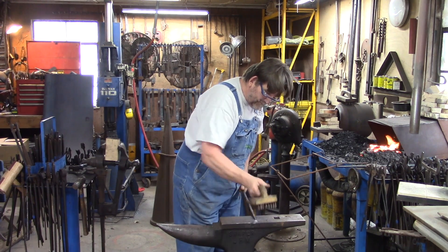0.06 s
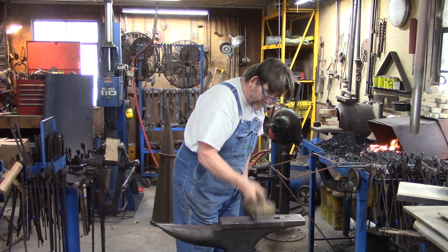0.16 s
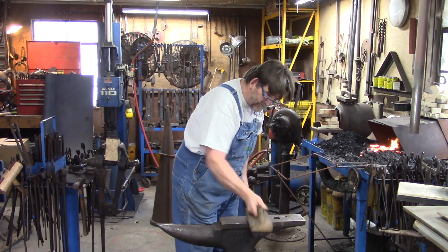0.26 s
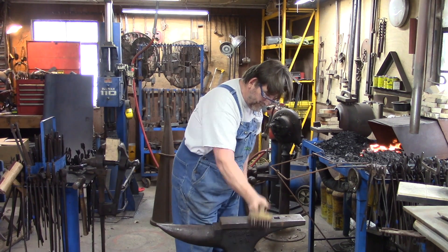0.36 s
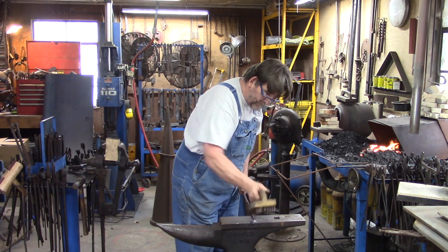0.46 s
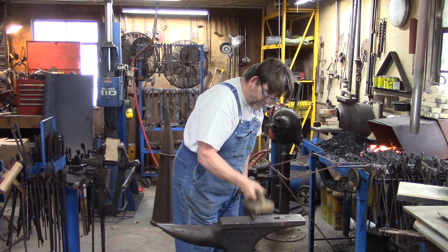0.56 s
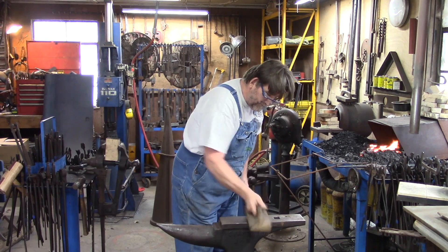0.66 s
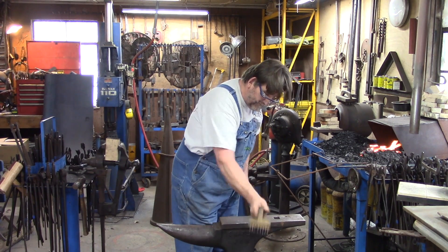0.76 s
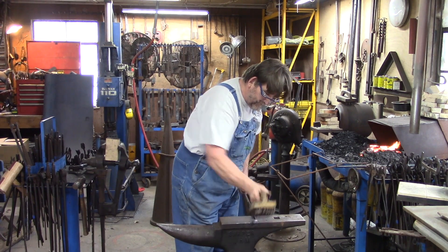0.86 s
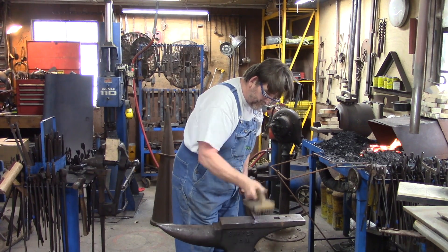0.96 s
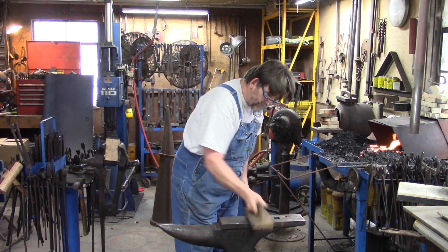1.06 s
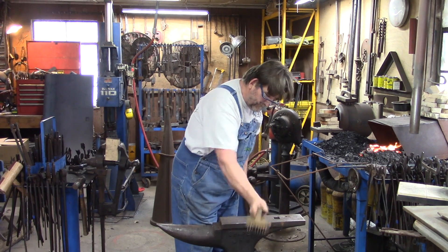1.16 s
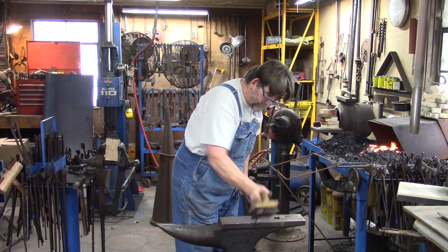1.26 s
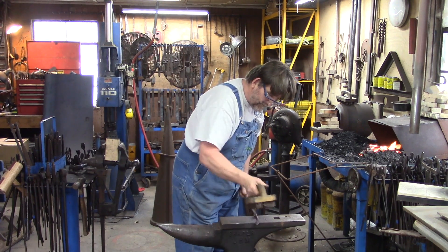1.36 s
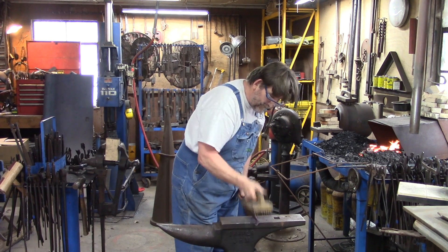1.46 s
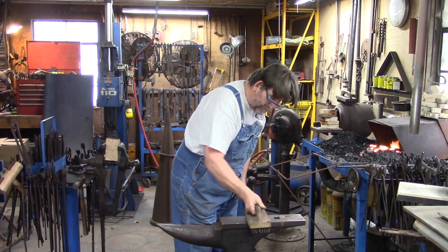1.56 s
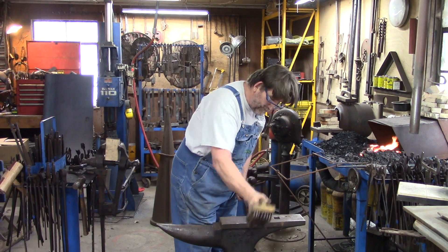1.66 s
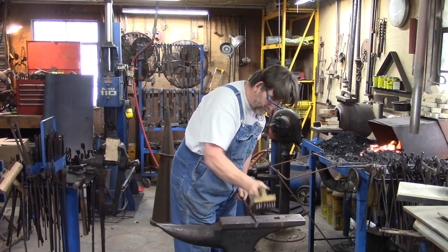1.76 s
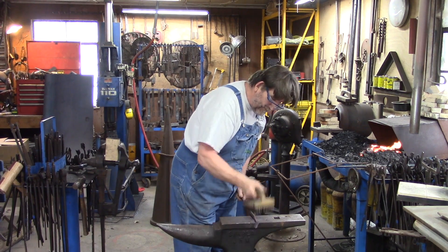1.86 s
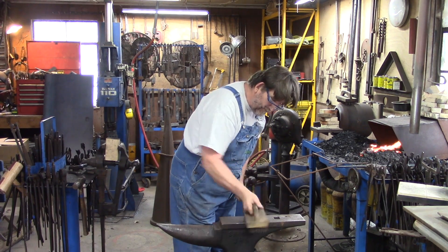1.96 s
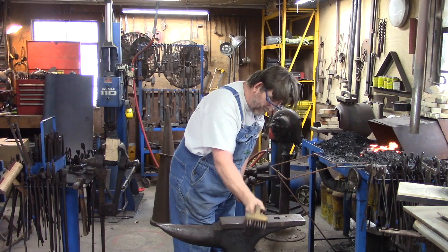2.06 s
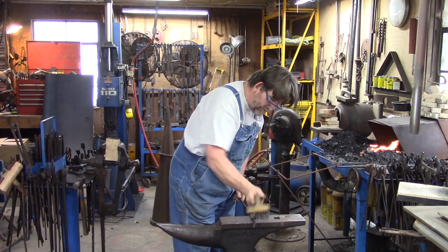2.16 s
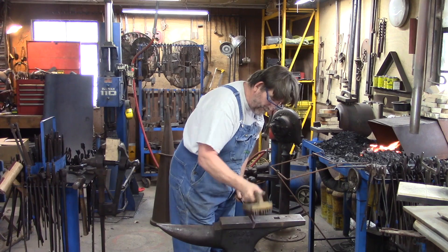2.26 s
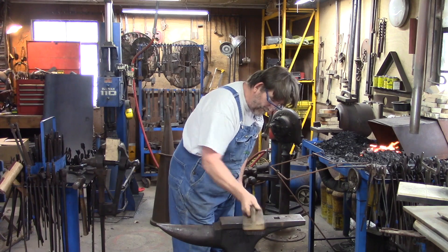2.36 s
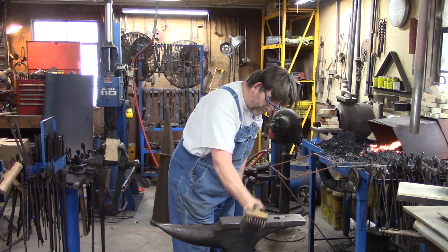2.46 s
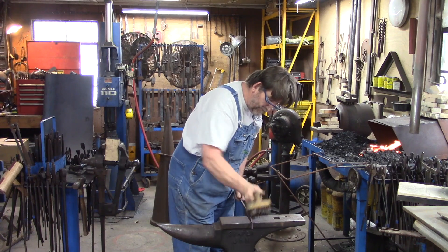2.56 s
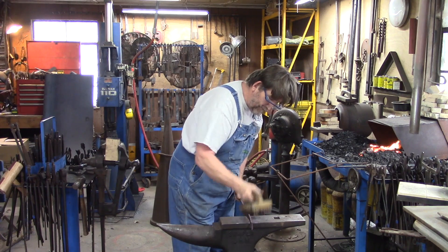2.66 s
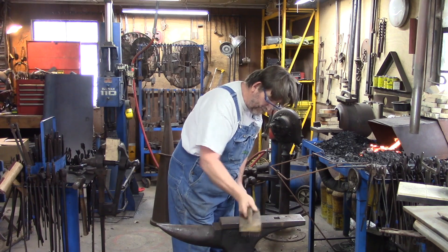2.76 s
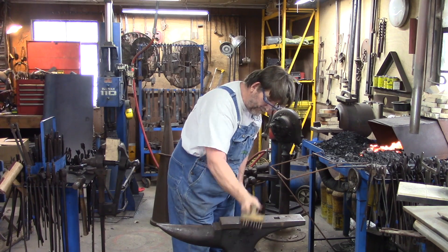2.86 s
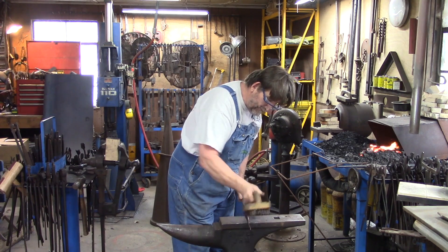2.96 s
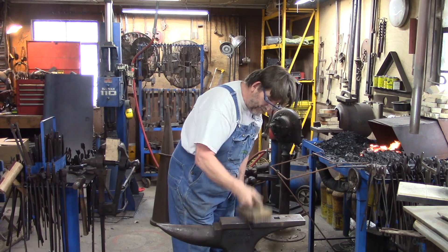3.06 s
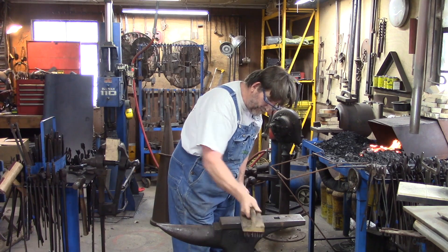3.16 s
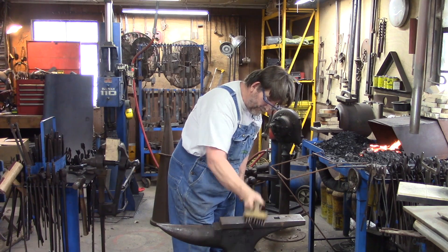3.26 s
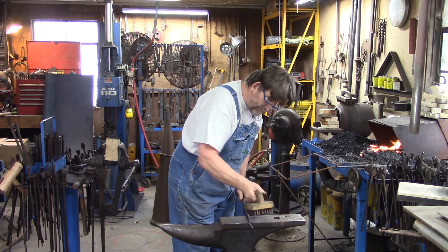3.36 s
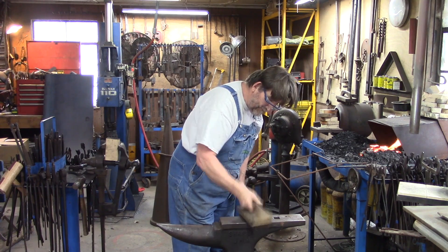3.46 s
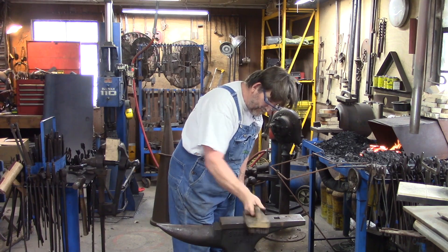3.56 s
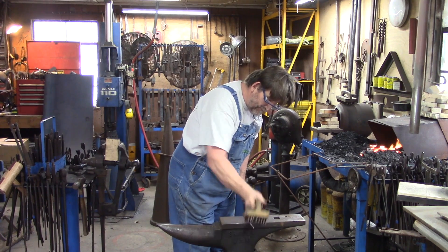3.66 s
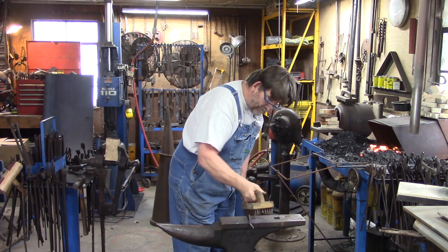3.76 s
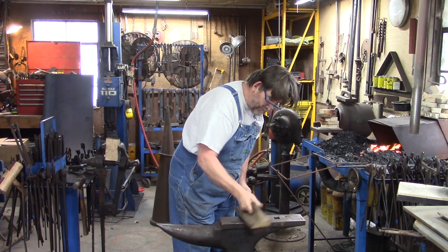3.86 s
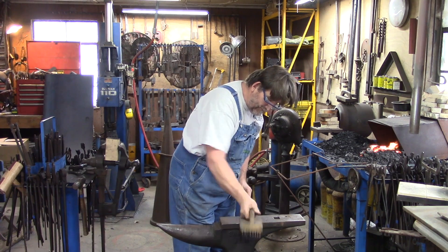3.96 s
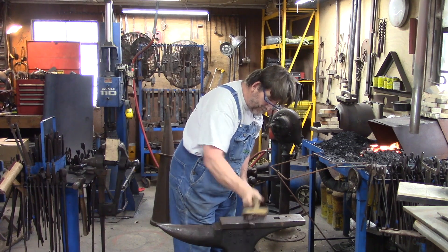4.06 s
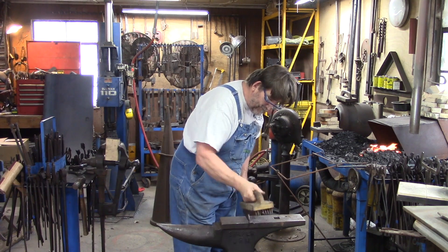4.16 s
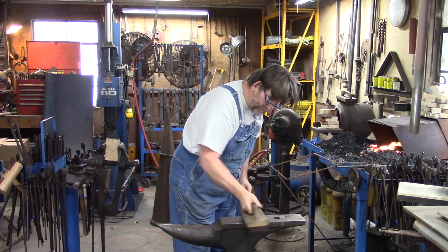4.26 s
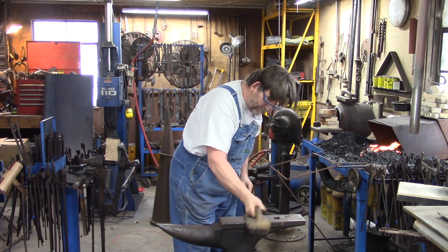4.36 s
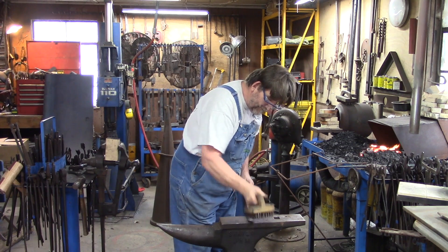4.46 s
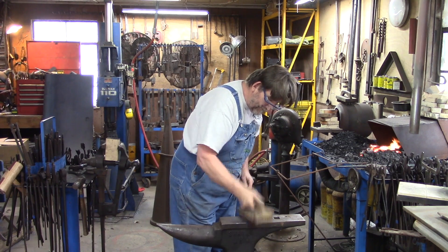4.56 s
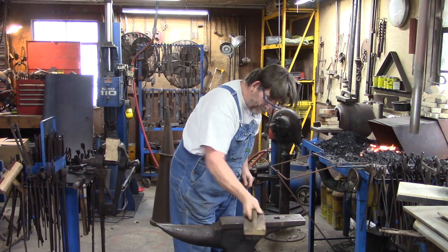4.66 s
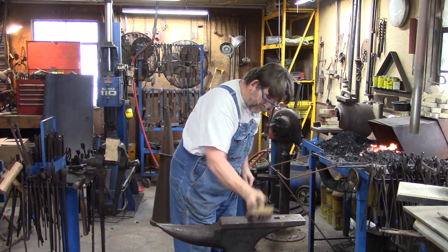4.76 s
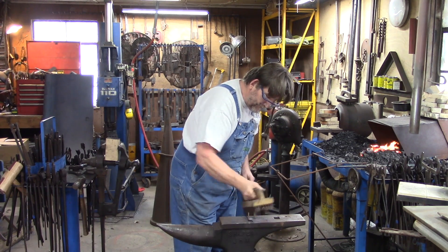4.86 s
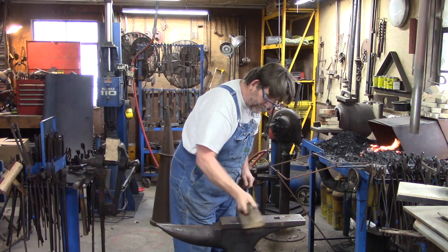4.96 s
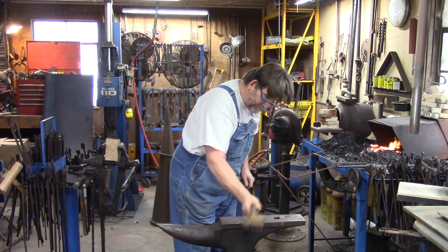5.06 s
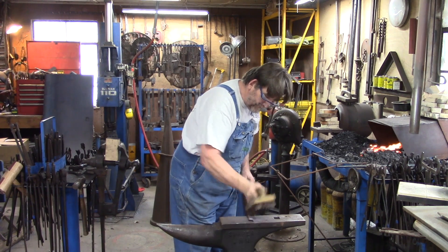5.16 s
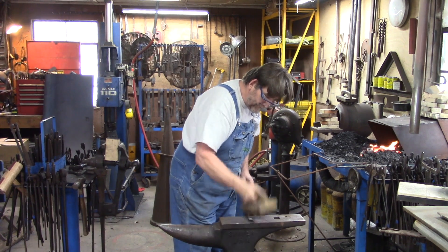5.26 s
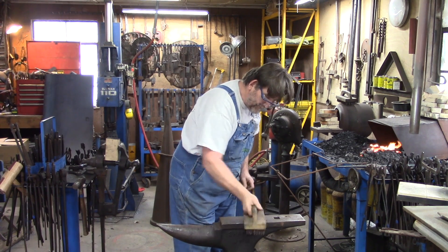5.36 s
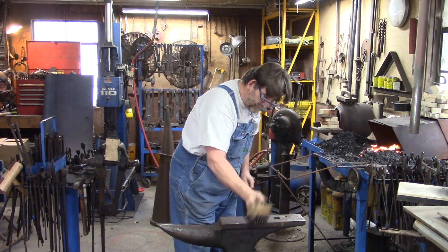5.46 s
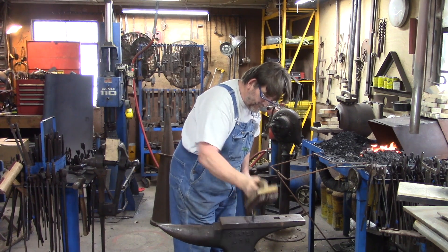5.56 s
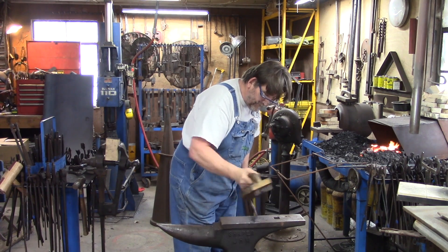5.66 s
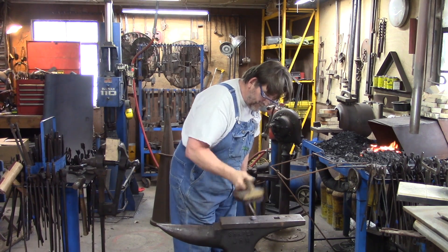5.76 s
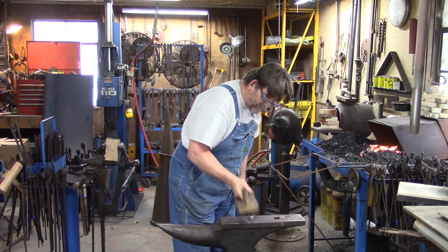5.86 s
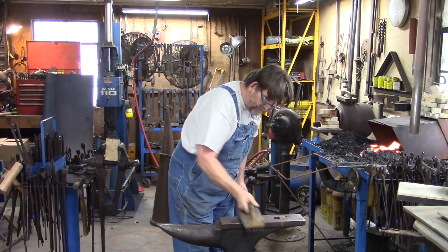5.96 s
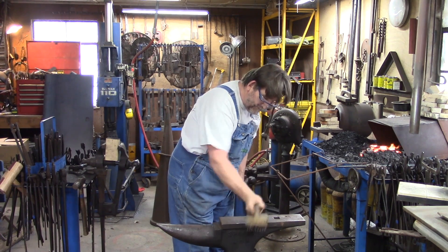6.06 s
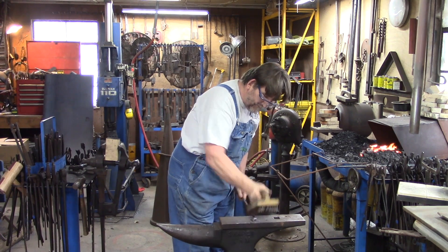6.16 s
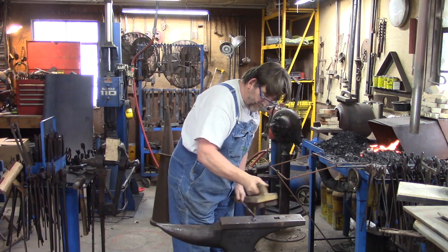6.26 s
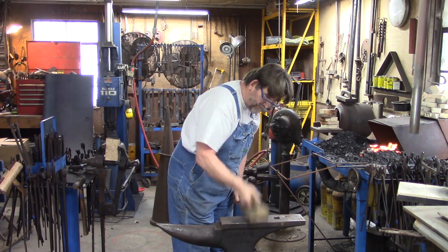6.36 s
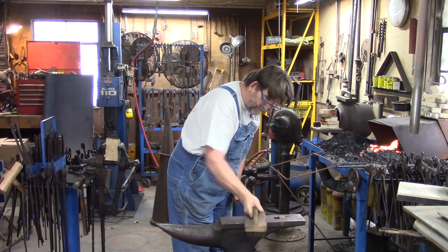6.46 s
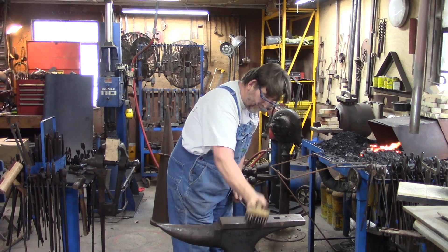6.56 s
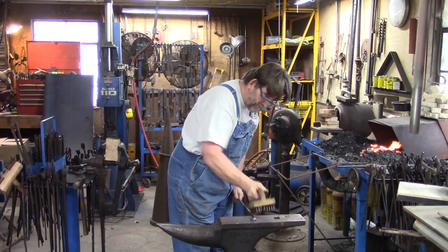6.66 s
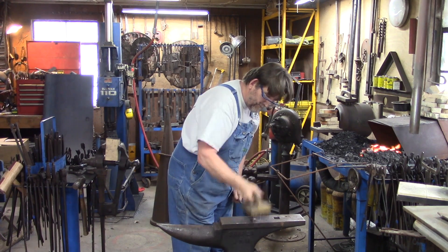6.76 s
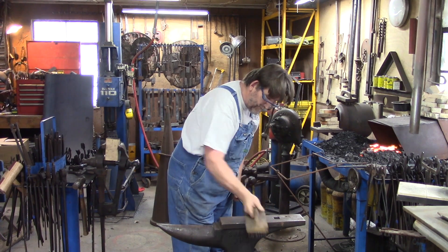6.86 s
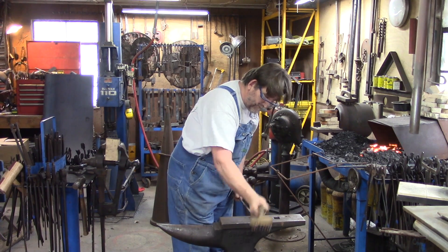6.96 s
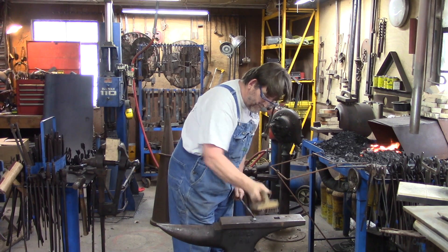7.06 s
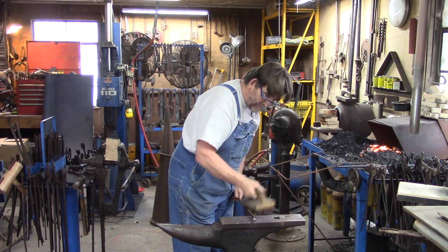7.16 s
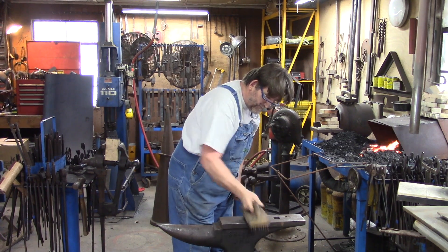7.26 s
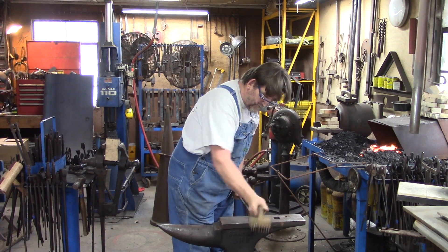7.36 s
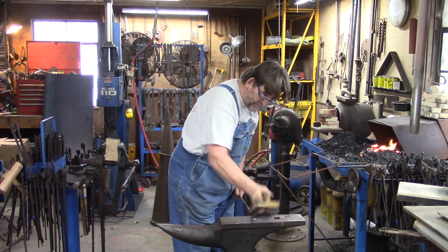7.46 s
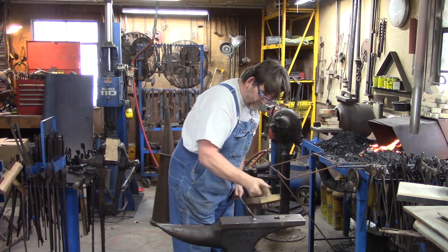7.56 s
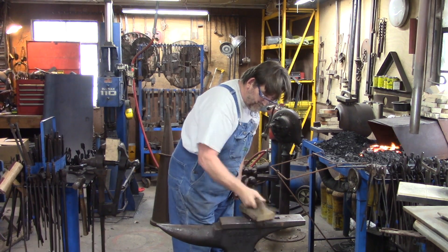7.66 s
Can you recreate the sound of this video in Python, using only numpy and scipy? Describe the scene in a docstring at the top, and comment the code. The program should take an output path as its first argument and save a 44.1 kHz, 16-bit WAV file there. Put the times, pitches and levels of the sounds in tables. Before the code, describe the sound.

The tail of an earlier brush stroke fades, then a hand wire brush scrapes forged steel on an anvil in short, even strokes, two to three per second. Each lands with a dull knock, rasps with bright metallic crackle and lifts quickly. Midway the sound drops out for an instant; later the piece rattles lightly as it is shifted. A large workshop echoes softly, a forge blower hums faintly; the microphone hears the brush clearly, nearly centred.

```python
"""First the fading echo of a brush stroke over a faint blower, then nineteen short strokes of a wire brush on steel.
The forged piece lies on an anvil in a large smithy. Wire tips snag and slip: random clicks make a dense crackle,
ping the wires and ring the steel, and die away in the hall as bands of fading noise.
The piece is tapped once and later shifted with a light rattle of small clicks; filtered noise makes the forge blower
far back. The sound drops out once for a moment."""
import sys
import numpy as np
from scipy import signal
from scipy.fft import rfft, irfft, next_fast_len
from scipy.io import wavfile

SR = 44100
rng = np.random.default_rng(int(sys.argv[2]) if len(sys.argv) > 2 else 0)


def master(y):
    """Save y as 16-bit WAV."""
    cut = np.clip(np.atleast_2d(y).T, -1, 1)
    pcm = np.round(cut * 32767)  # scale
    wavfile.write(sys.argv[1], SR, pcm.astype(np.int16))


def voltage_ratio(level):
    """Linear amplitude factor for a level in decibels (scalar or array-like)."""
    return 10 ** (np.asarray(level, float) / 20)


N = 340452   # samples heard
LEAD = SR // 4   # samples computed before the start, so that earlier echoes are under way
SIZE = next_fast_len(N + LEAD + SR)
HZ = np.maximum(np.arange(SIZE // 2 + 1) * SR / SIZE, 1)
TIME = (np.arange(N + LEAD) - LEAD) / SR   # seconds; 0 is the first sample heard


def rms_one(x):
    """Scale a sound to unit power."""
    return x / np.sqrt(np.mean(x ** 2) + 1e-20)


def at_hz(points, hz):
    """Read a table of (pitch, value) between its points, on a log pitch axis."""
    pitch_hz, value = np.array(points).T
    return np.interp(np.log(hz), np.log(pitch_hz), value)


def colour(x, spectrum_db):
    """Filter with the given dB at every frequency; minimum phase, so nothing sounds ahead of its cause."""
    cepstrum = irfft(spectrum_db * np.log(10) / 20, SIZE)
    cepstrum[1:SIZE // 2] *= 2
    cepstrum[SIZE // 2 + 1:] = 0
    response = np.exp(rfft(cepstrum))
    return irfft(rfft(x, SIZE) * response, SIZE)[..., :len(TIME)]


def resonate(x, modes):
    """Ring a set of resonators side by side; a narrower one rings longer."""
    out = 0
    for k, (hz, width_hz, level_db) in enumerate(modes):
        r = np.exp(-np.pi * width_hz / SR)
        top = [(1 - r * r) / 2, 0, (r * r - 1) / 2]
        bottom = [1, -2 * r * np.cos(2 * np.pi * hz / SR), r * r]
        sign = (-1) ** k
        out = out + sign * voltage_ratio(level_db) * signal.lfilter(top, bottom, x + 1e-18)
    return out


def snags(per_s, spread_db, clump_db, clump_s):
    """Tips that catch and slip: random clicks of uneven size, stronger and weaker in clumps; rms 1."""
    knots = np.arange(TIME[0], TIME[-1] + 1, clump_s)
    clumps = np.interp(TIME, knots, rng.standard_normal(len(knots)))
    uneven = np.minimum(rng.exponential(1, len(TIME)), 4)
    sizes = voltage_ratio(spread_db * uneven + clump_db * clumps)
    signs = rng.choice([-1, 1], len(TIME))
    happens = rng.random(len(TIME)) < per_s / SR
    return rms_one(sizes * signs * happens)


# The brush comes down on the steel; levels are relative:
# start_s, knock_db, treble_spray_db, thud_db (through anvil and stand), rise_s
LANDINGS = [(0.213, -8, -15.5, -48, 0.0033), (0.624, -10, -10, -47, 0.0085), (1.038, -14, -25, -38, 0.0072),
            (1.518, -17.5, -55, -49, 0.0038), (1.939, -11, -44, -47, 0.0026), (2.337, -8, -34, -52, 0.0024),
            (2.728, -9.5, -52, -70, 0.0019), (3.101, -12.5, -24, -52, .004),
            (3.483, -15.5, -25, -59, 0.0043), (3.865, -37, -60, -52, 0.0048),
            (4.244, -18, -33, -55, 0.0027), (4.604, -17.5, -30, -60, 0.0032),
            (4.973, -4.5, -25, -62, 0.0034), (5.326, -12, -32, -51, .004), (5.969, -18, -25.5, -52, 0.011),
            (6.416, -9, -38, -45, 0.0019), (6.830, -4.5, -28.5, -55, .003), (7.249, -7, -22, -41, 0.0022),
            (7.691, -5.5, -33, -45, 0.0037)]
# The push after each landing, in the same order; levels are relative:
# pressure_db, length_s, brightness_db, steel_ring_db, wooden_block_db
PUSHES = [(2.5, 0.12, -2, -11, -1.5), (0.5, 0.14, 0, -5.5, -1), (1.5, 0.12, -1, -4, -2),
          (-2.5, 0.099, 2, 1.5, -3), (-3.5, 0.096, 2, 0.5, 0), (-0.5, .10, -0.5, 2, 0.5),
          (1, 0.085, 1, -1, 0), (-1.5, 0.11, 0, 3.5, 0.5), (-4.5, .13, 0, 4.5, -0.5),
          (-1, 0.13, 0.5, 0, -2), (-0.5, 0.14, 0, -1.5, 0.5), (1.5, 0.12, 0.5, -0.5, 1.5),
          (2.5, 0.1, -1, 3, 0.5), (0.5, 0.13, 0, 1, 0), (0.5, 0.095, 2.5, 4, 0), (2, 0.11, 1, 2.5, 3),
          (1.5, .14, 0.5, -1.5, 1), (2, .14, -0.5, -1.5, 0), (5, .13, 3, -4, -2)]
# A tuft of wires catches on an edge of the piece and flares up; levels are relative:
# start_s, steel_ring_db, scratch_db
CATCHES = [(0.33, -26, -20.5), (0.70, -23, -24), (1.155, -28, -20), (1.59, -18, -26), (2.38, -25, -35),
           (2.76, -16, -27), (3.16, -15, -29), (3.575, -14, -23.5), (3.909, -11, -22), (4.30, -15, -25.5),
           (4.719, -14, -28), (5.017, -17, -21.5), (5.076, -17, -28), (5.44, -26, -25.5),
           (6.052, -12.5, -25), (6.465, -10, -26), (6.89, -21, -32), (7.38, -28, -21.5)]
# Every push speeds up, then slows before the lift: db on landing, db at full speed, db at the lift
RASP, SCRATCH, WIRES = (-20.5, -22, -20), (-30.5, -24.5, -21), (-34, -23.5, -26.5)
HIGH, LOW, WOOD = (-22, -20.5, -23), (-26, -21.5, -23.5), (-31.5, -38, -33.5)
FULL_SPEED_SHARE = 0.58   # of the push length
KNOCK_S, LIFT_S = 0.014, 0.034   # decay of the knock, decay as the wires leave
CATCH_RISE_S, CATCH_S = 0.0042, 0.018   # rise and decay of a flare
EARLIER_LIFT_S, EARLIER_DB = -0.053, -18   # a stroke that ended before the start: only its echo is left
# The favoured ping among the lower wires climbs through each stroke as they bend
BEND_HZ, BEND_OCTAVES, BEND_S = 1190, 1.04, 0.12


def contact():
    """Loudness of seven layers and the favoured ping of the bending wires: sudden landing, push, quick lift."""
    gains = np.zeros((7, len(TIME)))   # rasp, scratch, wires, high ring, low ring, block, knock
    bend_hz = np.full(len(TIME), 2. * BEND_HZ)
    for landing, push in zip(LANDINGS, PUSHES):
        land_s, knock_db, spray_db, thud_db, rise_s = landing
        press_db, length_s, bright_db, ring_db, wood_db = push
        since = np.clip(TIME - land_s, 0, None)
        lifting = np.exp(-np.clip(since - length_s, 0, None) / LIFT_S)
        down = np.minimum(since / rise_s, 1) ** 2 * lifting
        span = down > 1e-4
        down, since = down[span], since[span]
        course = [0, FULL_SPEED_SHARE * length_s, length_s]
        shapes = [RASP, SCRATCH, WIRES, HIGH, LOW, WOOD]
        extras_db = [0, bright_db, bright_db, ring_db, ring_db / 2, wood_db]
        for k, (shape, extra_db) in enumerate(zip(shapes, extras_db)):
            gains[k, span] += down * voltage_ratio(press_db + extra_db + np.interp(since, course, shape))
        # all tips strike together on landing: a dull knock and a spray of treble
        strike = down * np.exp(-np.clip(since - rise_s, 0, None) / KNOCK_S)
        gains[6, span] += strike * voltage_ratio(knock_db)
        gains[1:3, span] += strike * voltage_ratio(spray_db) * voltage_ratio([[-4], [0]])
        bend_hz[span] = BEND_HZ * 2 ** (BEND_OCTAVES * np.minimum(since / BEND_S, 1))
    for start_s, ring_db, scratch_db in CATCHES:
        since = np.clip(TIME - start_s, 0, None)
        flare = np.minimum(since / CATCH_RISE_S, 1) * np.exp(-since / CATCH_S)
        gains[1:5] += flare * voltage_ratio([[scratch_db], [scratch_db - 7], [ring_db], [ring_db - 17.5]])
    earlier = voltage_ratio(EARLIER_DB) * (TIME < EARLIER_LIFT_S)
    gains += earlier * voltage_ratio([[-3], [-7], [-12], [-14], [-14], [-20], [-30]])
    return gains, bend_hz


# Tone colour of the scrape: pitch_hz, level_db (per Hz, relative)
SCRAPE = [(24, -87), (40, -44.5), (180, -20), (345, -3.5), (585, -11), (1210, -11), (1850, -8), (3300, -9),
          (3740, -6.5), (4800, -8), (8990, -12), (14100, -25), (16000, -20.5)]


def scrape_band(low_hz, high_hz):
    """Make a filter that passes the scrape colour between two soft edges."""
    share = 1 / (1 + (low_hz / HZ) ** 6) / (1 + (HZ / high_hz) ** 6)
    spectrum_db = at_hz(SCRAPE, HZ) + 10 * np.log10(share + 1e-12)
    return lambda x: colour(x, spectrum_db)


# Resonances, levels relative: pitch_hz, width_hz, level_db
# The steel piece, lower and higher ring
LOW_RING = [(1646, 180, 1.5), (1824, 220, 4.5), (1998, 100, 3), (2296, 220, 1.5), (2680, 67, -6)]
HIGH_RING = [(3638, 55, 1.5), (3805, 94, 6.5), (3900, 120, 3), (4100, 86, -9), (4360, 47, -2),
             (5140, 41, -24)]
# The wooden back of the brush
BLOCK = [(344.6, 14, 4.5), (507.5, 31, 7.5), (646, 71, 3), (1084, 103, -0.5)]
# The brush body when jolted
KNOCK = [(1067, 190, -1.5), (1288, 27, 2.5), (1397, 75, 2), (1570, 97, -0.5), (1810, 120, 5),
         (2480, 1200, -6)]


def brush():
    """Tips rasp on the scale, wires ping at scattered pitches, and the same rubbing rings steel and block."""
    (rasp, scratch, wires, high, low, block, knock), bend_hz = contact()

    def layer(gain, level_db, clicks, body):
        """Clicks follow the contact, then sound through a body that is levelled by its steady response."""
        return voltage_ratio(level_db) * body(gain * clicks) / np.std(body(clicks))

    ring = layer(high, -2, snags(4000, 5.0, 3.3, .012), lambda x: resonate(x, HIGH_RING))
    out = layer(rasp, -4, snags(6000, 2.86, 4.2, .006), scrape_band(813, 3040))
    out += layer(scratch, 0, snags(8000, 3.0, 2.5, .009), scrape_band(3400, 6400))
    out += layer(wires, 0, snags(6000, 2.5, 3.3, 0.0061), scrape_band(6660, 29000))
    out += layer(low, -2, snags(2500, 2.8, 2.5, 0.0097), lambda x: resonate(x, LOW_RING))
    out += layer(block, -3, snags(3000, 5.3, 3.2, .01), scrape_band(13.0, 770))
    jolt = knock + 0.18 * rasp
    out += layer(jolt, -2, snags(2200, 2.06, 1.6, 0.0099), lambda x: resonate(x, KNOCK))
    out += layer(block, -2, snags(1500, 6.4, 0.74, 0.012), lambda x: resonate(x, BLOCK))
    return out + springing_wires(rasp, scratch, wires, bend_hz), ring


def springing_wires(rasp, scratch, wires, bend_hz):
    """Single wires spring free and ping for a few milliseconds, each click at one of 24 pitches."""
    clicks = snags(3000, 5.3, 2.3, 0.012)
    dealt = rng.integers(0, 24, len(TIME))   # which wire each click sets off
    out = 0
    for k, hz in enumerate(np.geomspace(950, 13000, num=24) * rng.uniform(0.91, 1.04, 24)):
        if hz > 6400:
            gain = wires * voltage_ratio(-6)
        elif hz > 3400:
            gain = scratch * voltage_ratio(4.5)
        else:   # louder the nearer the wire is to the favoured ping
            gain = rasp * voltage_ratio(9.5) * np.exp(-(np.log2(hz / bend_hz) / 0.35) ** 2)
        mode = (hz, 60 + 0.022 * hz, at_hz(SCRAPE, hz) + 21)
        out = out + resonate(gain * clicks * (dealt == k), [mode])
    return out


def thuds():
    """Low rumble of the stand under each push: a band of noise that starts at the landing and fades."""
    gain = 0
    for land_s, knock_db, spray_db, thud_db, rise_s in LANDINGS:
        gain = gain + voltage_ratio(thud_db) * (TIME > land_s) * np.exp(-np.abs(TIME - land_s) / 0.051)
    band = signal.butter(2, [65, 210], "band", fs=SR, output="sos")
    return gain * rms_one(signal.sosfilt(band, rng.standard_normal(len(TIME))))


# Loudness curve of the rattle while the piece is slid on the anvil: time_s, level_db (relative)
SHIFT = [(5.685, -57), (5.695, -38), (5.721, -38.5), (5.751, -28.5), (5.769, -40), (5.887, -51), (5.9, -64)]
# Its ring while it slides: pitch_hz, width_hz, level_db (relative)
SHIFT_RING = [(2780, 130, -0.5), (3580, 120, 3.5), (4370, 200, 6), (5380, 150, 1), (6400, 210, 2.5),
              (7240, 180, -1), (7820, 120, 3), (8450, 90, -4), (9500, 82, -23), (10700, 120, -19),
              (12100, 100, -14), (13600, 100, -21), (14900, 90, -15)]
TOUCH_S, TOUCH_DB = 3.842, -42   # the piece is tapped lightly just before a stroke


def shifted_piece():
    """Uneven small ticks of steel on the anvil face; each resonance is caught in bursts of its own."""
    time_s, level_db = np.transpose(SHIFT)
    clicks = snags(1800, 1.8, 3.4, 0.011)
    gain = voltage_ratio(np.interp(TIME, time_s, level_db, left=-120, right=-120))
    gain += voltage_ratio(TOUCH_DB) * (TIME > TOUCH_S) * np.exp(-np.abs(TIME - TOUCH_S) / 0.0038)
    knots = np.arange(time_s[0], time_s[-1], .018)
    rings = 0
    for mode in SHIFT_RING:
        burst = voltage_ratio(5.0 * np.interp(TIME, knots, rng.standard_normal(len(knots))))
        rings = rings + resonate(gain * clicks * burst, [mode])
    return voltage_ratio(-2.5) * rings / np.std(resonate(clicks, SHIFT_RING))


# Time for the echo to fade by 60 dB: pitch_hz, fade_s
HALL_T60 = [(100, 0.1), (300, 0.75), (800, 0.55), (2000, 0.56), (5000, 0.57), (9000, 0.29), (14000, 0.34)]


def hall(x, count=4):
    """Diffuse echo, middle and side: noise fading band by band; its pattern keeps changing, in a cycle of four."""
    t, echo = np.arange(SR * 3 // 4) / SR, 0
    edges = 40 * 2 ** np.arange(0, 9.1, .5)
    white = rng.standard_normal((2, count, 2, len(t)))   # neighbouring bands get unrelated noise
    for k, (low, high) in enumerate(zip(edges, edges[1:])):
        band = signal.butter(2, [low, high], "band", fs=SR, output="sos")
        t60 = at_hz(HALL_T60, np.sqrt(low * high))
        echo = echo + signal.sosfilt(band, white[k % 2]) * voltage_ratio(-60 * t / t60) / np.sqrt(t60)
    echo = echo * np.minimum(t / np.array([[.007], [.02]]), 1)   # near walls answer soon, the wide part later
    echo = echo / np.sqrt(np.sum(echo ** 2, axis=2, keepdims=True))
    # fade from one pattern to the next every 0.05 s, round and round
    place = TIME / .05 - np.arange(count)[:, None]
    share = np.cos(np.pi / 2 * np.minimum(np.abs((place + 1) % count - 1), 1))
    spectrum = np.sum(rfft(share * x, SIZE)[:, None] * rfft(echo, SIZE), axis=0)
    return irfft(spectrum, SIZE)[:, :len(TIME)]


# Tone colour of the air rush: pitch_hz, level_db (per Hz, relative)
BLOWER = [(18, -58), (30, -24), (127, -22), (184, -12), (394, -13), (616, -9), (1010, -12.5), (1390, -10),
          (1540, -10), (2750, -18.5), (8000, -27), (16000, -36.5)]
# Its breathy whine: pitch_hz, width_hz, level_db (relative)
BLOWER_WHINE = [(614, 220, -6.5), (1382, 21, 5.5), (2850, 130, -5.5)]


def blower():
    """Steady air rush with a breathy whine, both from noise, middle and side."""
    rush = rms_one(colour(rng.standard_normal((2, len(TIME))), at_hz(BLOWER, HZ)))
    whine = rms_one(resonate(rng.standard_normal((2, len(TIME))), BLOWER_WHINE))
    return voltage_ratio(-43.5) * rush + voltage_ratio(-46) * whine


# Stereo width, side against middle before a lift of 3 dB: pitch_hz, level_db
WIDTH = [(60, -9), (110, -19), (200, -16.5), (380, -24), (700, -25), (1290, -36), (2380, -24.5),
         (4400, -16.5), (8120, -16), (15000, -19.5)]


def scene():
    """Direct sound in the middle; echo and blower also feed a narrow side."""
    rasp, ring = brush()
    rasp = rasp + thuds() + shifted_piece()
    to_hall = rasp + 0.54 * ring   # the high ring beams forward, less of it reaches the walls
    mid, side = voltage_ratio(-4) * hall(to_hall) + blower() * voltage_ratio([[0], [3]])
    side = colour(side, at_hz(WIDTH, HZ) + 3)
    mid = rasp + ring + mid
    return np.array([mid + side, mid - side])[:, LEAD:]


def band_limit(x):
    """A steep low-pass at the top of the band."""
    return signal.sosfilt(signal.butter(12, 16450, fs=SR, output="sos"), x)


def record(dry):
    """Rounded peaks, bass and top cut, and a short dropout."""
    x = 1.044 * np.tanh(dry)
    x = signal.sosfilt(signal.butter(2, 61, "high", fs=SR, output="sos"), x)
    x = signal.sosfilt(signal.cheby2(14, 45, 15750, fs=SR, output="sos"), x)
    # a faint remnant from the cut on, then silence until the sound is back
    cut_s, silent_s, back_s, remnant_db = 4.399, 4.414, 4.429, -38
    t = np.arange(N) / SR
    remnant = voltage_ratio(remnant_db) * (t < silent_s)
    mix = x * np.where((t < cut_s) | (t > back_s), 1, remnant)
    return band_limit(mix)


dry = scene()
out = record(dry)
master(out)
```